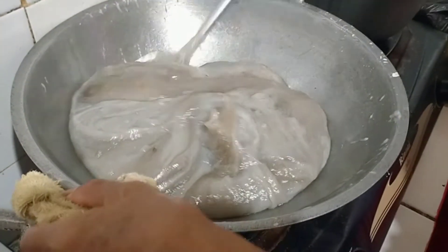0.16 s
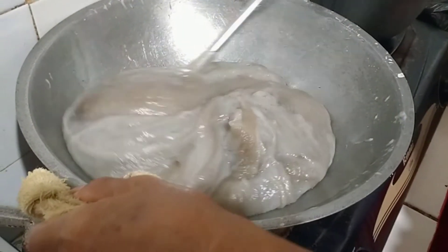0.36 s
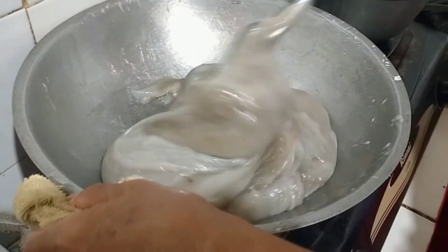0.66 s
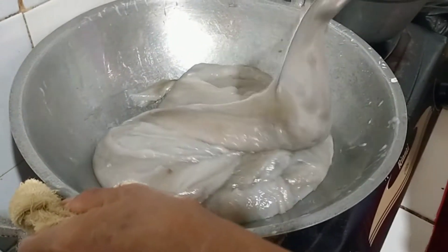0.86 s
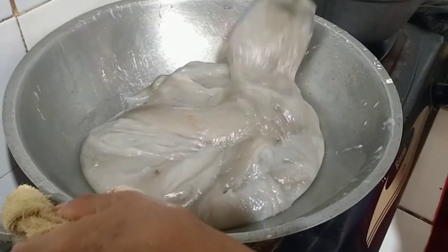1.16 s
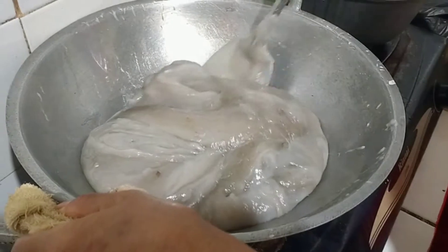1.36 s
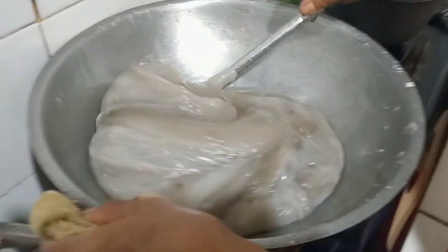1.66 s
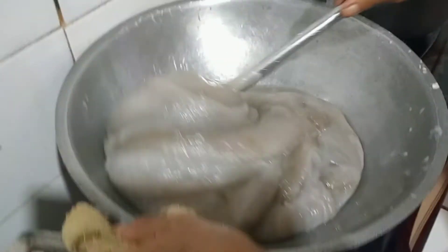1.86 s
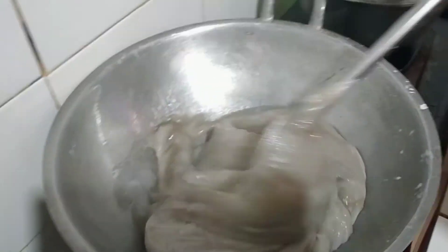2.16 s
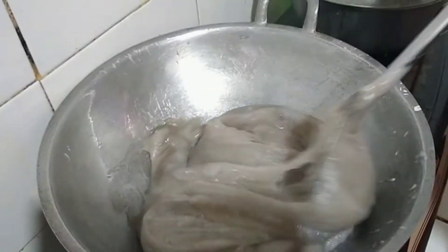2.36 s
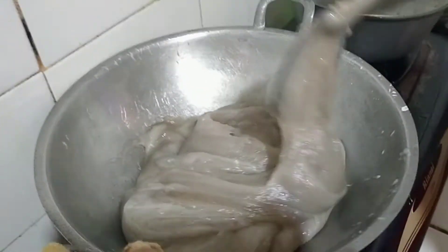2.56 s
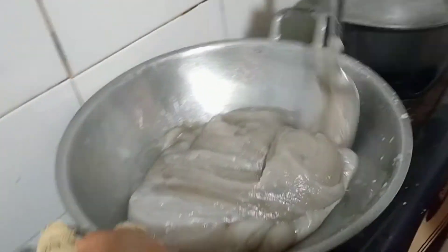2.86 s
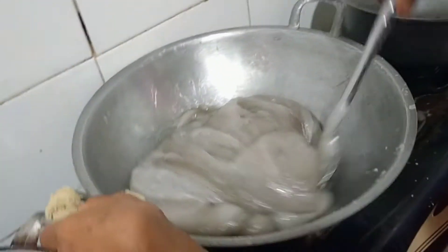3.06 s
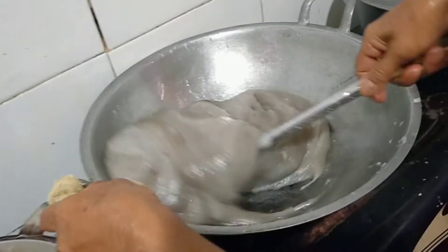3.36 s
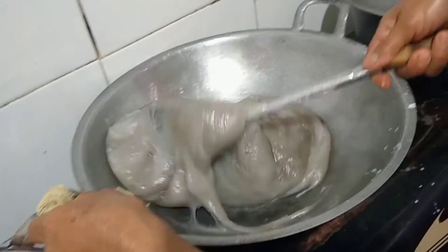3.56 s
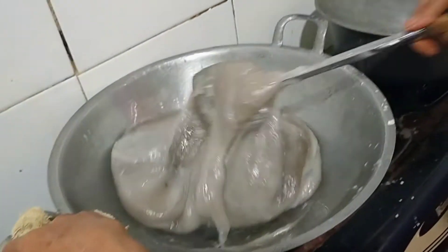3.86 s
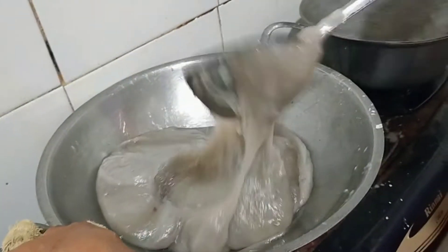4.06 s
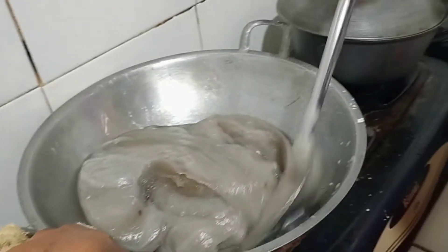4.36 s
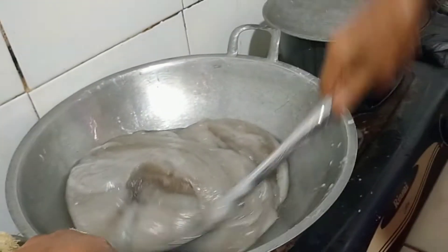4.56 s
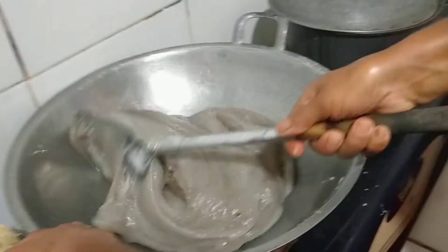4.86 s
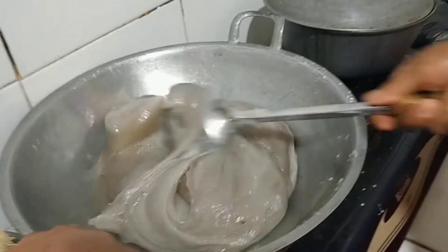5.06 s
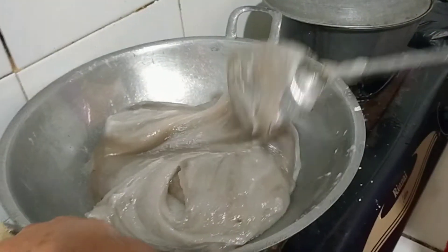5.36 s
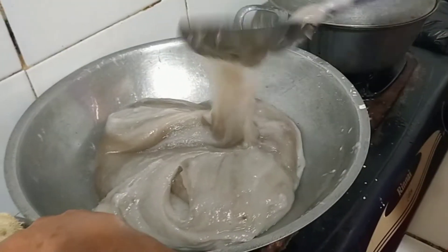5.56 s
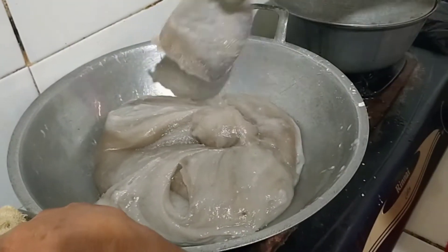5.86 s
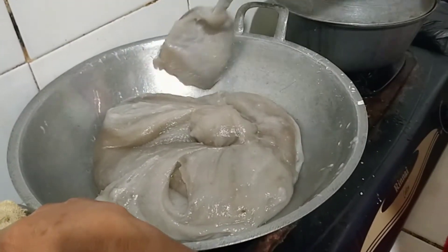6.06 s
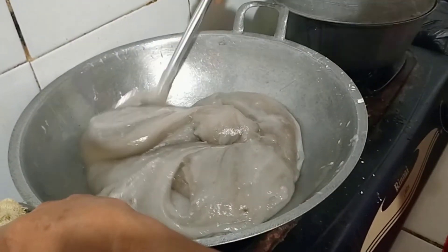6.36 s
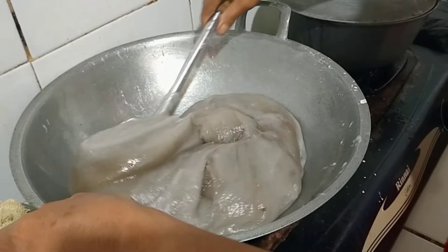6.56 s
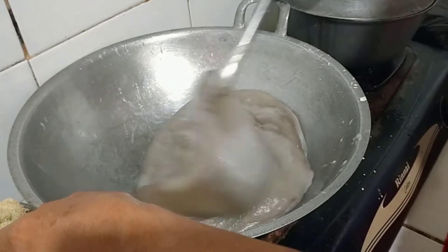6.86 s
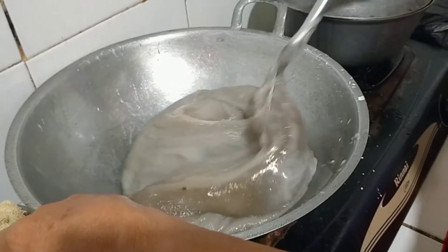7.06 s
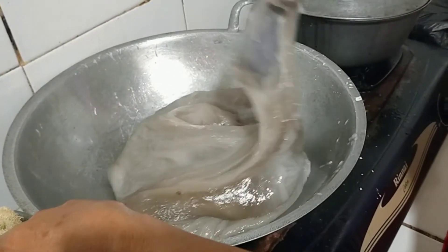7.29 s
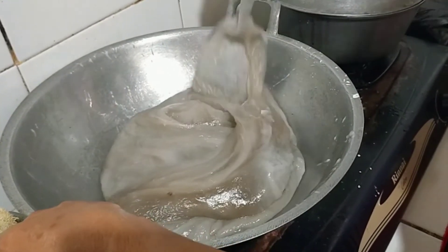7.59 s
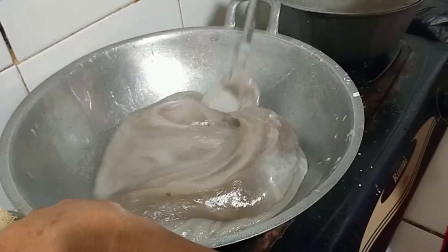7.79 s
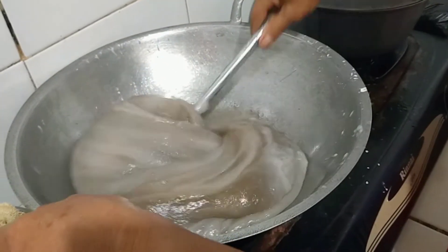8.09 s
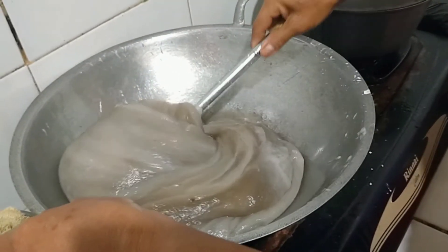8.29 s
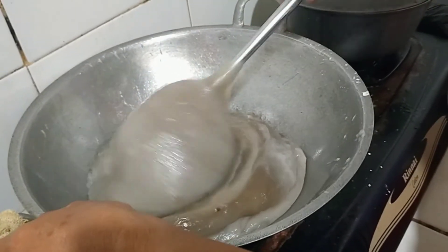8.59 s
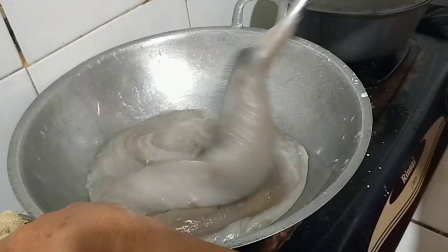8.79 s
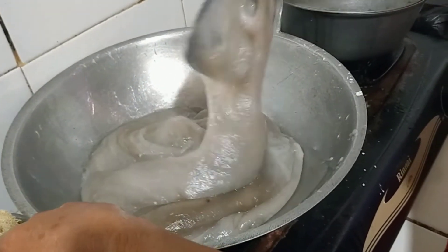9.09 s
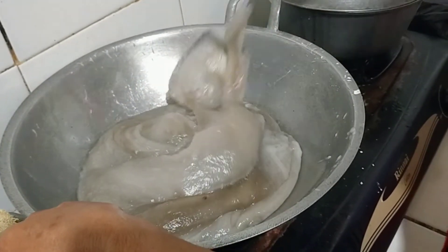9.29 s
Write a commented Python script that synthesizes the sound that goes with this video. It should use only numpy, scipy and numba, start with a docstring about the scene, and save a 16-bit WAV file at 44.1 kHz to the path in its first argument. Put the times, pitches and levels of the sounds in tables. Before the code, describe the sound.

Thick dough is folded in a hot metal wok: sharp clanks, gritty sinking scrapes, sticky squelches and pops, soft sizzling, in a small tiled kitchen.

```python
"""A low hum, a rumble and a wet sizzle are heard first, with dough squelching and a spoon scraping.
A metal spoon folds thick, hot dough in an aluminium wok on a stove in a small tiled kitchen.
Most strokes knock on the wall, ringing its modes; stick-slip clicks then scrape down under the dough.
Random clicks also make the sizzle and squelch, through resonances and coloured filters.
Filtered noise and sines make the stove's rumble and hum; a decaying noise echo makes the tiles."""
import sys
import numpy as np
from scipy import signal
from scipy.fft import rfft, irfft
from scipy.io import wavfile
from scipy.ndimage import uniform_filter1d
from numba import njit

SR = 44100
rng = np.random.default_rng(int(sys.argv[2]) if len(sys.argv) > 2 else 0)


def int16_out(signal):
    """Quantize to a 16-bit WAV file."""
    q = np.round(np.clip(np.atleast_2d(signal).T, -1, 1) * 32767)
    wavfile.write(sys.argv[1], SR, q.astype(np.int16))


N = 415863
TIME = np.arange(N) / SR
PUSH_AGE = TIME[:int(.7 * SR)]  # seconds since the start of a push, fold or spurt
EASE_DB_PER_S = 11  # every push, fold and spurt eases as the dough takes the load
PUSH_ATTACK_S, PUSH_T60_S = 0.033, 0.37  # a push bites and lets go; easing shortens the release


def undb(db):
    """Level law: decibels to amplitude gain."""
    return 10 ** (np.asarray(db) / 20)


def unit(x):
    """Power normalisation: scale to rms 1."""
    return x / np.sqrt(np.mean(x ** 2))


def curve(rows, axis=1):
    """Linear interpolation: one column of a table, joined by straight lines in time."""
    rows = np.asarray(rows)
    return np.interp(TIME, rows[:, 0], rows[:, axis])


def add(out, start, x):
    """Superposition: mix x into out from a start in seconds."""
    i = max(int(start * SR), 0)
    out[i:i + len(x)] += x[:max(len(out) - i, 0)]


def colour(x, points, tilt_db=0, size=2048):
    """Minimum-phase filtering from (Hz, dB) points; white noise keeps its power."""
    hz, db = np.transpose(points)
    f = np.maximum(np.arange(size // 2 + 1) * SR / size, 1)
    # the tilt, in dB per octave, turns about 3 kHz and stops changing below 700 Hz
    tilt = tilt_db * np.log2(np.maximum(f, 700) / 3000)
    shape = np.interp(np.log(f), np.log(hz), db) + tilt
    # folding the cepstrum onto positive times makes the response causal
    cepstrum = irfft(np.log(undb(shape)))
    cepstrum[1:size // 2] *= 2
    cepstrum[size // 2 + 1:] = 0
    response = irfft(np.exp(rfft(cepstrum)))
    return signal.fftconvolve(x, response / np.linalg.norm(response))[:len(x)]


@njit
def resonate(x, hz, width):
    """Two-pole resonance: a band-pass whose centre may move every sample; gain 1 at the centre."""
    y, band, low = np.empty(len(x)), 0., 0.
    for i in range(len(x)):
        g, k = np.tan(np.pi * hz[i] / SR), width / hz[i]
        v = (band + g * (x[i] - low)) / (1 + g * (g + k))
        band, low, y[i] = 2 * v - band, low + 2 * g * v, k * v
    return y


def resonate_fixed(x, hz, width):
    """Two-pole resonance with a steady centre."""
    return resonate(x, np.full(len(x), float(hz)), float(width))


def sing(x, hz, db, width_hz):
    """Resonant emphasis: lift a steady or moving peak out of x; the power stays near 1."""
    peak, gain = unit(resonate(x, hz * np.ones(len(x)), float(width_hz))), undb(db)
    overlap = np.mean(x * peak)
    return (x + gain * peak) / np.sqrt(1 + 2 * overlap * gain + gain ** 2)


def walk(rate):
    """Slow random modulation: a smoothed wander of spread 1, with rate new values a second."""
    k = int(SR / rate)
    steps = np.repeat(rng.standard_normal(N // k + 1), k)
    return unit(uniform_filter1d(steps, k)[:N])


def clicks(rate, spread_db):
    """Poisson-like impulses: random clicks, rate a second, a few larger than the rest; rms 1."""
    happens = rng.random(N) < rate / SR
    size = np.minimum(rng.exponential(size=N), 4)
    sign = np.sign(rng.standard_normal(N))
    return unit(happens * sign * undb(spread_db * size))


def fade(t, t60):
    """Exponential damping: 60 dB down after t60."""
    return np.exp(-np.log(1000) * t / t60)


def tail(t60):
    """Dense modal overlap: a decaying noise of unit energy."""
    x = rng.standard_normal(SR // 2) * fade(TIME[:SR // 2], t60)
    return x / np.linalg.norm(x)


def swell(length, attack_s, release_t60):
    """Attack-release envelope: rise, ease off throughout, and release after length."""
    rise = np.minimum(PUSH_AGE / attack_s, 1)
    ease = undb(-EASE_DB_PER_S * PUSH_AGE)
    return rise * ease * fade(np.maximum(PUSH_AGE - length, 0), release_t60)


def piece(x, start):
    """Windowing: the stretch of x that an event starting then plays."""
    return np.take(x, int(start * SR) + np.arange(len(PUSH_AGE)), mode="wrap")


# The wok wall's modes. Each row: nominal frequency in Hz, mean relative level in dB, t60 in seconds.
WOK_MODES = [(915, -5, .13), (1000, -6, .11), (1270, -8, .16), (1735, -10, .18), (1870, -5, .13),
             (2055, -3, .15), (2260, -5, .24), (2470, -6, .22), (2565, -4, .2), (2765, 0, .25),
             (3255, 0, .19), (3635, -1, .19), (3725, -5, .18), (3855, -3, .17), (4095, -5, .15),
             (4180, -4, .14), (4479, -12, .13), (5550, -15, .2), (5862, -12, .12), (6690, -12, .1),
             (7000, -15, .13), (11400, -10, .08)]


def wall_ring(scatter_db=2.0, split=0.0039):
    """Modal superposition, unit energy; a bowl not quite round splits each mode into a beating pair."""
    t = TIME[:SR // 2]
    x = np.zeros(len(t))
    for k, (hz, db, t60) in enumerate(np.repeat(WOK_MODES, 2, axis=0)):
        level, detune, phase = rng.standard_normal(3)
        mode_hz = hz * (1 + (-1) ** k * split + 0.0015 * detune)
        x += undb(db + scatter_db * level) * fade(t, t60) * np.sin(2 * np.pi * (mode_hz * t + phase))
    return x / np.linalg.norm(x)


# Spectrum of the room noise. Each row: frequency in Hz, relative density in dB per Hz.
ROOM_COLOUR = [(20, 6), (45, -15), (75, -9.5), (170, -13.5), (300, -22), (700, -21.5), (1500, -21),
               (3800, -20), (4800, -34.5), (6300, -32), (10000, -37.5), (11500, -31.5), (16000, -39)]
# Steady hum. Each row: frequency in Hz, mean level in dB.
HUM = [(47, -70), (100, -63), (194, -77), (238, -82)]
# The low rumble swells and ebbs. Each row: time in seconds, level in dB before the rumble trim.
RUMBLE = [(0, -57), (4.3, -59.5), (4.8, -53.5), (6.2, -53), (6.45, -59.5), (8, -55.5), (8.8, -56),
          (9.1, -63)]


def stove(room_db=-56, rumble_hz=46, rumble_width_hz=13, rumble_trim_db=-4.0):
    """Broadband noise, narrow-band noise and sines: room air, a swelling rumble and a wavering hum."""
    air = unit(colour(rng.standard_normal(N), ROOM_COLOUR)) * undb(room_db + 0.38 * walk(4.3))
    rumble = unit(resonate_fixed(rng.standard_normal(N), rumble_hz, rumble_width_hz))
    hum = np.zeros(N)
    for hz, db in HUM:
        tone = np.sqrt(2) * np.sin(2 * np.pi * hz * TIME + .5 * walk(3.1))
        hum += undb(db + 1.2 * walk(3.7)) * tone
    return air + rumble * undb(curve(RUMBLE) + rumble_trim_db) + hum


# Spectra of frying and of fine spray. Each row: frequency in Hz, relative density in dB per Hz.
SIZZLE_COLOUR = [(300, -19), (700, -12.5), (1100, -4.5), (1900, -3.5), (2500, -0.5), (3100, -2.5),
                 (3800, -1.5), (4700, -19.5), (7000, -46)]
SPRAY_COLOUR = [(2000, -27), (3700, 1), (4750, -10), (6200, -0.5), (7700, -6), (8600, -5.5), (9900, -9),
                (11500, -2.5), (13300, -11.5), (16000, -11)]
# Wet dough against hot metal. Each row: time in seconds, frying level in dB and fine spray level
# in dB (both before trims and flutter), mean pitch of the steam vent in Hz.
SIZZLE = [(0, -43, -55, 2780), (.3, -47.5, -52, 2780), (.98, -48, -53, 2810), (1.15, -48, -49, 2810),
          (1.9, -53.5, -56.5, 2700), (2.13, -53, -58.5, 3150), (2.24, -46, -47, 3500),
          (2.72, -46, -49, 3690), (3.45, -55, -59.5, 3230), (3.82, -52.5, -52.5, 3230),
          (3.94, -61, -66.5, 2780), (4.27, -54, -72, 2410), (4.95, -52, -56, 2960), (5.25, -50, -56, 3020),
          (5.55, -49.5, -52.5, 2800), (5.75, -46.5, -49, 2990), (6.03, -47.5, -48.5, 3000),
          (6.55, -54.5, -58.5, 3270), (6.95, -56.5, -62, 3240), (7.45, -74, -74, 3100),
          (8.3, -62, -66.5, 2990), (8.8, -54, -57, 2700), (9.42, -53.5, -60.5, 2570)]
# Spurts of spray as fresh dough meets bare metal. Each row: start in seconds, length before release
# in seconds, level in dB before easing and flutter.
SPURTS = [(.59, .04, -52), (.85, .05, -51), (1.015, .06, -48), (2.36, .04, -51), (2.56, 0.054, -49.5),
          (3.547, 0.05, -58.5), (8.276, 0.023, -61), (8.404, 0.017, -62), (8.705, 0.091, -57),
          (9.107, 0.066, -54), (9.296, .03, -55)]
# A thin whistle of escaping steam. Each row: time in seconds, level in dB.
WHISTLE = [(3.3, -90), (3.5, -70), (3.9, -66), (4.28, -70), (4.4, -85)]


def sizzle(fry_trim_db=-1, spray_trim_db=-1, ring_db=-16, flutter_db=1.2, spit_db=1.0,
           vent_db=-6, vent_width_hz=650, vent_waver=.05, whistle_hz=1688):
    """Impulsive bubble noise: tiny steam bubbles burst on hot metal; a vent resonates, steam whistles."""
    bursts = clicks(rate=7000, spread_db=0.5)
    wall = signal.fftconvolve(bursts, wall_ring())[:N]
    frying = unit(colour(bursts, SIZZLE_COLOUR) + undb(ring_db) * wall)
    vent_hz = curve(SIZZLE, axis=3) * 2 ** (vent_waver * walk(8))
    frying = sing(frying, vent_hz, vent_db, vent_width_hz)
    spray = colour(clicks(rate=12000, spread_db=3.0), SPRAY_COLOUR) * undb(spit_db * walk(14))
    hiss = frying * undb(curve(SIZZLE) + fry_trim_db)
    hiss += spray * undb(curve(SIZZLE, axis=2) + spray_trim_db)
    mist = colour(clicks(rate=6000, spread_db=3), SPRAY_COLOUR, tilt_db=1.5)
    for start, length, db in SPURTS:
        envelope = swell(length, attack_s=0.019, release_t60=0.13)
        add(hiss, start, undb(db) * piece(mist, start) * envelope)
    whistle_phase = 2 * np.pi * np.cumsum(whistle_hz * (1 + 0.0056 * walk(90))) / SR
    whistle = unit(np.sin(whistle_phase) * undb(1.3 * walk(25)))
    return hiss * undb(flutter_db * walk(25)) + whistle * undb(curve(WHISTLE))


# Spectrum of tearing dough. Each row: frequency in Hz, relative density in dB per Hz.
DOUGH_COLOUR = [(80, -18.5), (160, -1), (250, -1), (350, 1.5), (450, -1.5), (600, -9.5), (1000, -2.5),
                (3000, -50)]
# Dough torn and folded apart from the pushes. Each row: start in seconds, length before release
# in seconds, level in dB before easing and the squelch trim.
FOLDS = [(0, 0.064, -43.5), (0.316, 0.051, -48), (.47, 0.23, -47.5), (.72, 0.14, -55), (0.884, 0.19, -53.5),
         (1.16, .04, -48), (2.125, 0.079, -57), (2.67, .08, -54.5), (2.77, 0.025, -49), (3.592, .025, -53),
         (4.345, 0.035, -43.5), (4.888, 0.049, -50), (5.46, .07, -58.5), (5.694, 0.066, -52),
         (5.782, 0.061, -46), (6.037, 0.033, -42), (6.834, 0.027, -56), (7.254, 0.026, -53),
         (7.606, 0.032, -51), (8.143, 0.11, -62), (8.72, 0.032, -54.5)]
# Air pockets popping in the dough. Each row: start in seconds, peak in dB before the pop trim and decay,
# starting pitch in Hz, t60 in seconds, rise in octaves.
POPS = [(.037, -30.5, 2460, 0.038, 0.018), (.075, -30, 930, 0.039, 0.0092), (.107, -22, 970, .04, 0.038),
        (.333, -36, 447, 0.025, 0), (.579, -37.5, 481, 0.045, 0.11), (2.03, -45, 80.2, 0.12, 0),
        (5.703, -37.5, 840, 0.044, 0), (5.80, -48.5, 565, 0.073, 0.21), (6.7821, -43, 323, 0.05, 0.035),
        (7.619, -30, 878, 0.034, 0.38), (7.6254, -27.5, 1238, 0.0418, 0.22),
        (7.649, -35, 1450, 0.069, 0.43), (7.725, -32, 225.7, 0.052, 0.018), (7.764, -39, 1464, 0.1, 0.44),
        (7.769, -37, 196, .06, 0.054), (7.792, -38, 217, 0.11, 0), (7.832, -38, 215.5, 0.21, 0.49)]


def dough(squelch_trim_db=-3, pop_trim_db=-2, cavity_hz=220, cavity_db=-6, lumpy_db=1.5, sticky_db=-65.5):
    """Granular tearing and cavity resonance: folds tear around a changing hollow; trapped air pops."""
    tears = unit(colour(clicks(rate=700, spread_db=1.5), DOUGH_COLOUR))
    hollow = unit(resonate(tears, cavity_hz * 2 ** (0.28 * walk(9)), 55.0))
    strain = np.full(N, undb(sticky_db))  # constant faint tacking, before the squelch trim
    for start, length, _, _, _, db, *_ in PUSHES:
        add(strain, start, undb(db) * swell(length, PUSH_ATTACK_S, PUSH_T60_S))
    for start, length, db in FOLDS:
        add(strain, start, undb(db) * swell(length, attack_s=0.019, release_t60=0.19))
    lumps = undb(squelch_trim_db + lumpy_db * walk(22))
    out = unit(tears + undb(cavity_db) * hollow) * strain * lumps
    t = TIME[:SR // 4]
    for start, db, hz, t60, rise in POPS:
        # the pitch rises over the first half of t60
        pitch = hz * 2 ** (rise * np.minimum(2 * t / t60, 1))
        phase = 2 * np.pi * np.cumsum(pitch) / SR
        wet = 1 + 0.92 * unit(uniform_filter1d(rng.standard_normal(len(t)), size=40))
        envelope = fade(t, t60) * np.minimum(t / 0.0043, 1)
        add(out, start, undb(db + pop_trim_db) * envelope * wet * np.sin(phase))
    return out


# Spectrum of the scraping edge. Each row: frequency in Hz, relative density in dB per Hz.
SCRAPE_COLOUR = [(150, -13.5), (600, -9), (1100, 0.5), (1700, -1), (2800, 0), (4100, -2.5), (4850, -16),
                 (6200, -11.5), (9800, -22.5), (11400, -13.5), (16000, -33)]
# The wok's deep modes, stirred when the boom sweeps across them. Each row: frequency in Hz,
# width in Hz, gain in dB relative to the boom.
DEEP_MODES = [(621, 18, 8.5), (864, 6.9, -16)]
# Pushes of the spoon along the wall, a few to a stroke. Each row: start in seconds, length before release
# in seconds, rasp level in dB, wall boom, fine grit and shoved dough levels in dB before their trims
# (all before easing), nominal boom pitch at the start in Hz, blade pitch in Hz, blade in dB above the rasp.
PUSHES = [(.015, 0.058, -38, -39, -58, -51.5, 1200, 2870, -27),
          (0.077, 0.13, -41, -38, -43.5, -48, 1110, 4000, -4),
          (1.232, 0.093, -39, -60, -45, -49, 1210, 3170, -14),
          (1.357, 0.2, -39, -37.5, -43.5, -43, 1000, 2840, -29),
          (1.565, 0.096, -40, -41.5, -45, -43.5, 850, 3880, 1),
          (1.724, .22, -65, -52.5, -64, -66, 820, 2780, -3),
          (2.794, 0.11, -39.5, -69, -40, -61, 1030, 4040, -5),
          (2.921, 0.27, -41.5, -37, -44.5, -44.5, 957, 3030, -17),
          (3.199, 0.072, -41.5, -34.5, -54, -51.5, 775, 3494, 6),
          (3.292, 0.23, -66.5, -48.5, -67, -61, 730, 3360, -2),
          (4.389, 0.15, -34.5, -46.5, -39, -58, 1170, 4070, -0.5),
          (4.595, .1, -41.5, -51, -46, -55.5, 1060, 3800, -10),
          (4.7, .085, -39.5, -49, -44, -54, 1000, 3720, -1),
          (6.085, 0.098, -37.5, -53, -41, -43.5, 1010, 3420, -17),
          (6.227, 0.21, -42, -43, -47, -50, 1064, 4040, 1),
          (7.644, 0.13, -47, -57, -72, -50, 1300, 3300, -14),
          (7.848, 0.097, -45.5, -47.5, -69, -45, 770, 2880, -11),
          (7.991, 0.13, -44, -45.5, -50, -51, 695, 3450, -3.5)]
# Brief grazes of the spoon. Each row: start in seconds, level in dB before the touch envelope,
# length scale in seconds, treble tilt in dB per octave.
GRAZES = [(.345, -43.5, 0.034, -1), (0.502, -52, 0.02, 4), (0.681, -47.5, 0.028, -2),
          (0.943, -45, 0.025, -6), (1.089, -41, 0.04, -1), (2.016, -46.5, 0.063, 2.5),
          (3.599, -49, 0.033, 0.5), (4.184, -56, 0.0207, -12), (6.698, -51, 0.025, -0.5),
          (6.811, -48.5, 0.049, -0.5), (6.92, -49, 0.06, 1), (7.179, -48, 0.063, -2.5),
          (7.265, -44.5, 0.057, -1), (8.47, -48.5, 0.0485, 2.5)]


def scrapes(boom_trim_db=-6.0, grit_trim_db=-5, ring_db=-13, boom_width_hz=230, blade_width_hz=600,
            judder_db=1.25, boom_attack_s=0.071, sink_octaves_per_s=1.0):
    """Stick-slip friction: slips down the wall ring the blade, the wall and its sinking boom."""
    slips = clicks(rate=3200, spread_db=1.0) * undb(judder_db * walk(70))
    wall = signal.fftconvolve(slips, wall_ring())[:N]
    rasp = unit(colour(slips, SCRAPE_COLOUR) + undb(ring_db) * wall)
    grit = colour(clicks(rate=9000, spread_db=2.0), SPRAY_COLOUR)
    waver = 1 + 0.06 * walk(25)
    out = np.zeros(N)
    for start, length, rasp_db, boom_db, grit_db, _, start_hz, blade_hz, blade_db in PUSHES:
        # the boom sinks as the spoon travels down
        sink = 2 ** (-sink_octaves_per_s * np.minimum(PUSH_AGE, length))
        boom_hz = start_hz * sink * piece(waver, start)
        boom = resonate(piece(slips, start), boom_hz, float(boom_width_hz))
        boom = resonate(boom, boom_hz, 2. * boom_width_hz)
        deep = sum(undb(db) * resonate_fixed(boom, hz, width) for hz, width, db in DEEP_MODES)
        boom = unit(boom + deep) * undb(boom_db + boom_trim_db)
        edge = sing(piece(rasp, start), blade_hz, blade_db, blade_width_hz) * undb(rasp_db)
        edge += piece(grit, start) * undb(grit_db + grit_trim_db)
        add(out, start, edge * swell(length, PUSH_ATTACK_S, PUSH_T60_S))
        add(out, start, boom * swell(length, boom_attack_s, PUSH_T60_S))
    for start, db, length, tilt_db in GRAZES:
        age = TIME[:SR // 4] / length
        touch = np.minimum(5 * age, 1) * np.exp(-age ** 2)
        stretch = slips[int(start * SR):][:len(age)]
        add(out, start, undb(db) * colour(touch * stretch, SCRAPE_COLOUR, tilt_db))
    return out


# Spectrum of metal on metal. Each row: frequency in Hz, relative density in dB per Hz.
KNOCK_COLOUR = [(80, -17.5), (230, -17.5), (600, -18.5), (1000, -17), (1600, -3.5), (2600, 1), (4100, 1),
                (4800, -8), (6200, -3.5), (9800, -10.5), (11400, -2.5), (13000, -14), (16000, -14)]


def blow(tilt_db, crack_t60=0.014, dense_t60=0.13, dense_db=-1.0, modes_db=-2):
    """Impact excitation: a hard crack, a crowd of quickly damped modes, and the wall's clearer ones."""
    noise = tail(crack_t60) + undb(dense_db) * tail(dense_t60)
    return colour(noise, KNOCK_COLOUR, tilt_db) + undb(modes_db) * wall_ring()


# Small taps of the spoon's edge, duller where dough cushions them. Each row: start in seconds,
# level in dB before the tap trim, treble tilt in dB per octave.
TAPS = [(.051, -26, -14), (0.5044, -27, -8), (0.6606, -27, -9), (0.93, -24.5, -9), (1.094, -27, 7),
        (2.319, -32, -7), (4.632, -29, -3), (6.7853, -36, 1), (7.653, -25.5, -8), (8.48, -34, -4),
        (9.402, -40, -4)]
# Spoon blows and rebounds. Each row: start in seconds, level in dB before the knock trim, treble tilt
# in dB per octave, low wall ring in Hz, its gain in dB, high wall ring in Hz, its gain in dB.
KNOCKS = [(1.1576, -6.5, -0.5, 1090, 7, 2680, -2), (1.159, -14.5, 0, 1730, 16.5, 3570, 14),
          (1.172, -26, 5, 1000, 7, 2500, -1), (2.7784, -9.5, 0.5, 1020, 1, 4060, -9),
          (2.7843, -16, -4, 1405, 6, 4020, 0), (2.794, -15, -5, 950, -26.5, 4200, 14),
          (4.3506, -3.5, 1.5, 1330, 12, 2450, -14), (4.359, -13.5, 1, 1400, -2, 3430, 14.5),
          (6.0414, -2, 2, 2100, 10, 4060, 7), (6.053, -7.5, -3.5, 870, 11.5, 3294, 7.5),
          (6.060, -10, -3, 900, 13, 2150, 1), (9.4212, -15.5, -6, 2140, 11, 2450, 10)]


def knocks(knock_trim_db=5, width_hz=240, tap_trim_db=8):
    """Position-dependent modal excitation: where the spoon hits favours a low and a high group."""
    out = np.zeros(N)
    for start, db, tilt_db in TAPS:
        tap = tail(0.0041) + 0.58 * tail(0.055)
        add(out, start, undb(db + tap_trim_db) * colour(tap, KNOCK_COLOUR, tilt_db))
    for start, db, tilt_db, low_hz, low_db, high_hz, high_db in KNOCKS:
        x = blow(tilt_db)
        low = undb(low_db) * resonate_fixed(x, low_hz, width_hz)
        high = undb(high_db) * resonate_fixed(x, high_hz, width_hz)
        add(out, start, undb(db + knock_trim_db) * (x + low + high))
    return out


def scene(room_t60=0.22, echo_db=-11):
    """Reverberation: everything in the wok echoes briefly off the tiles, over the stove."""
    background = stove()
    wok = sizzle() + dough() + scrapes() + knocks()
    echo = np.zeros(N)
    add(echo, .005, signal.fftconvolve(wok, tail(room_t60))[:N])
    return (wok + undb(echo_db) * echo + background)[None]


def record(dry, top_hz=15800):
    """Saturation and band-limiting: round the hardest peaks and cut the top."""
    ceiling = undb(-5.5)
    rounded = ceiling * np.tanh(dry / ceiling)
    return signal.sosfilt(signal.ellip(8, .2, 70, top_hz, fs=SR, output="sos"), rounded)


dry = scene()
out = record(dry)
int16_out(out)
```